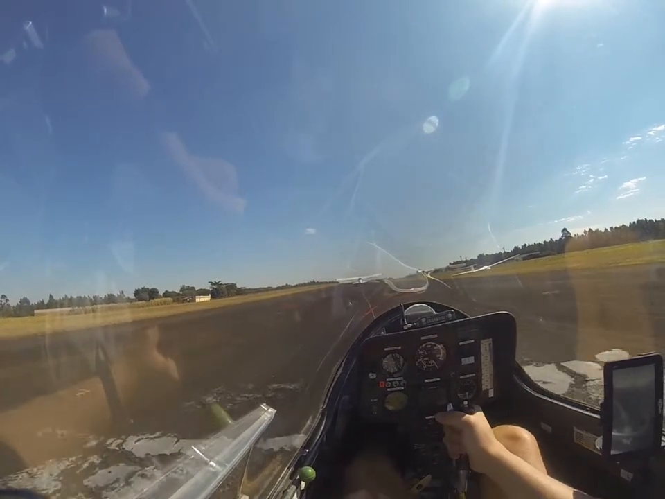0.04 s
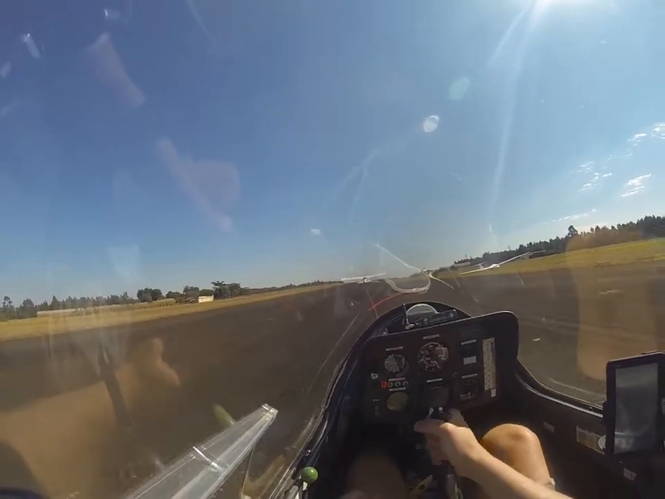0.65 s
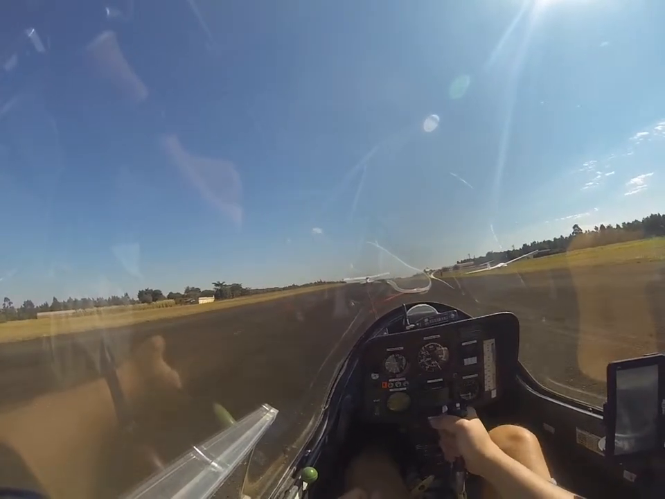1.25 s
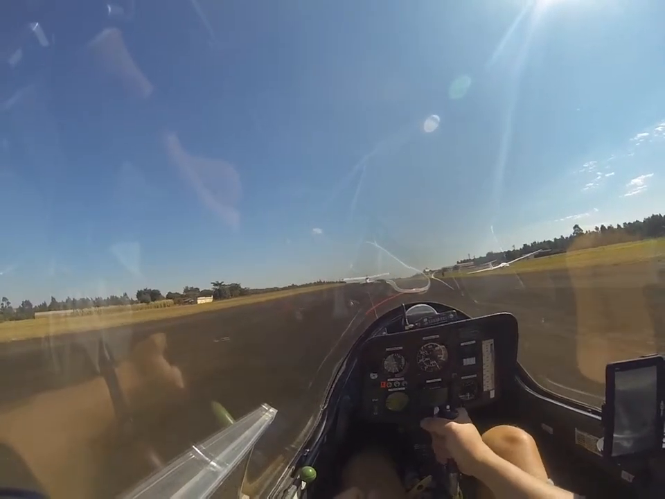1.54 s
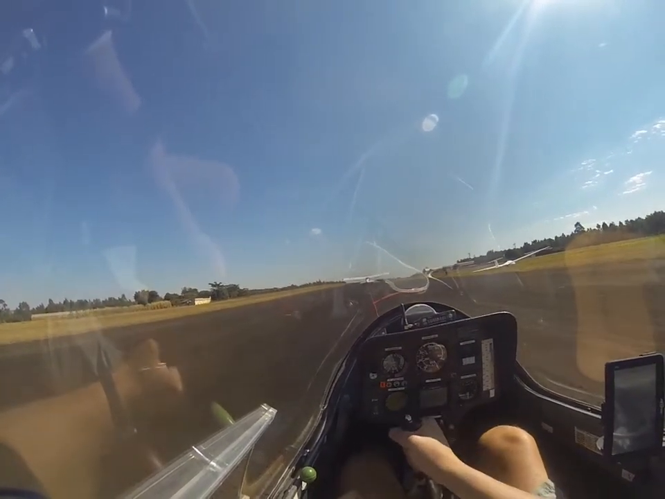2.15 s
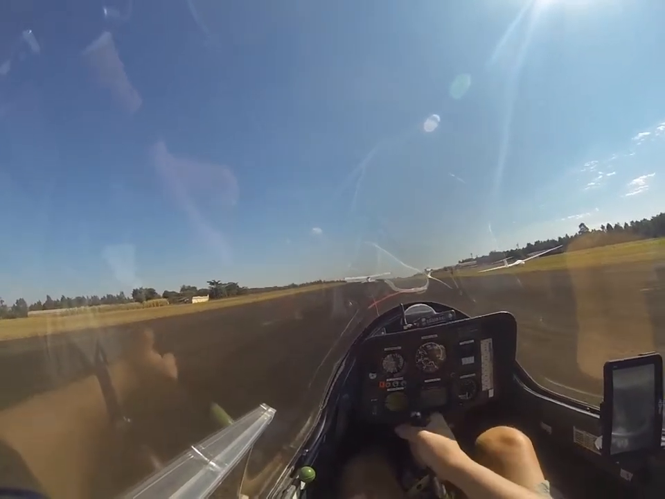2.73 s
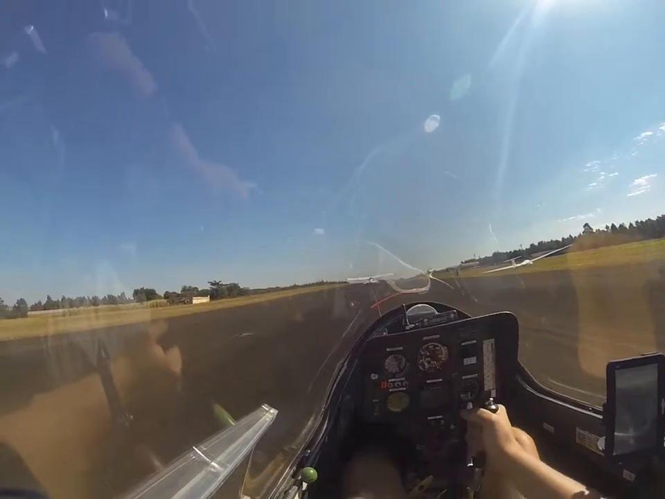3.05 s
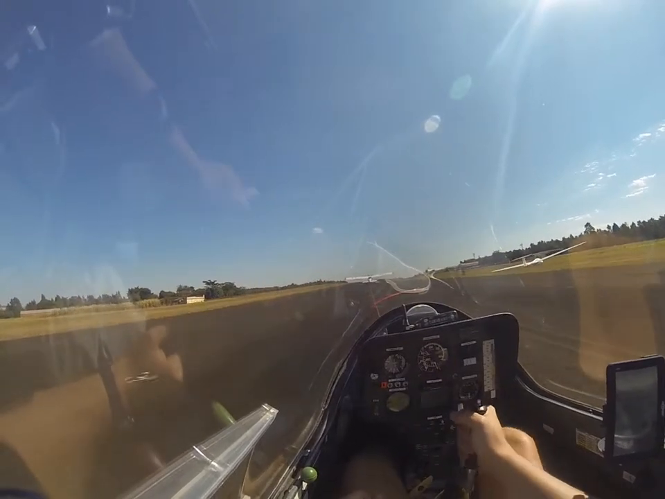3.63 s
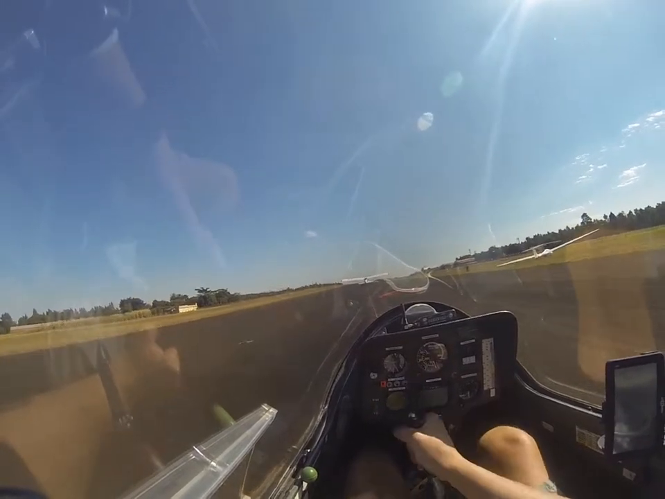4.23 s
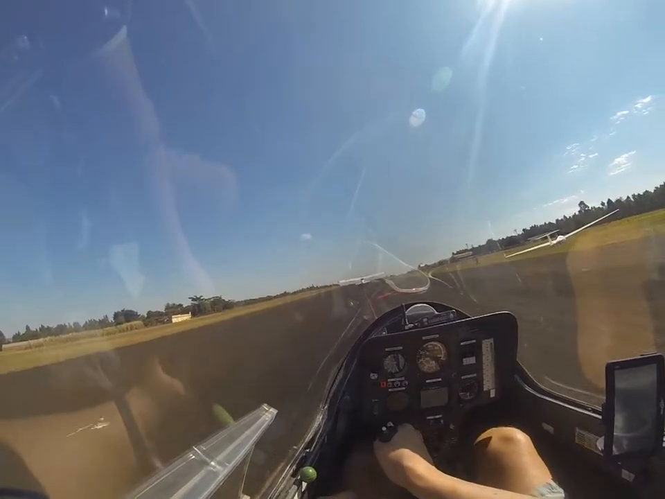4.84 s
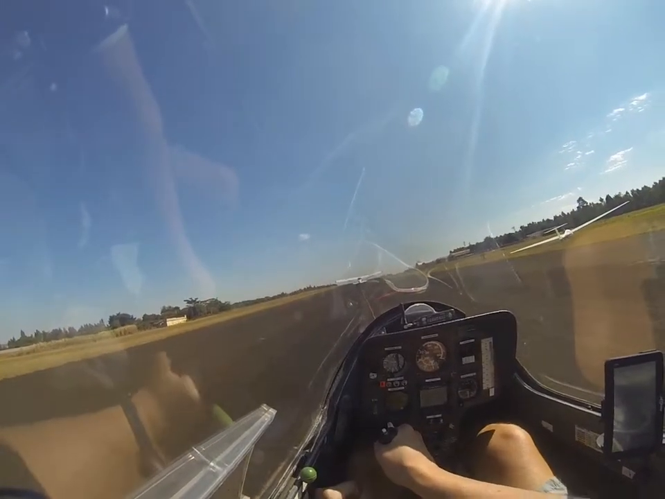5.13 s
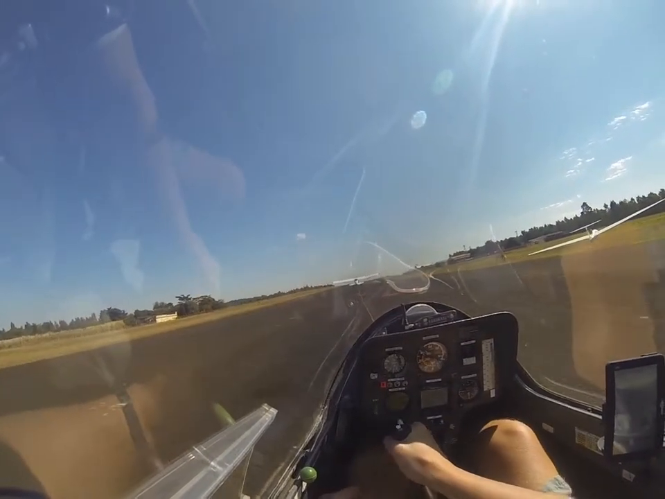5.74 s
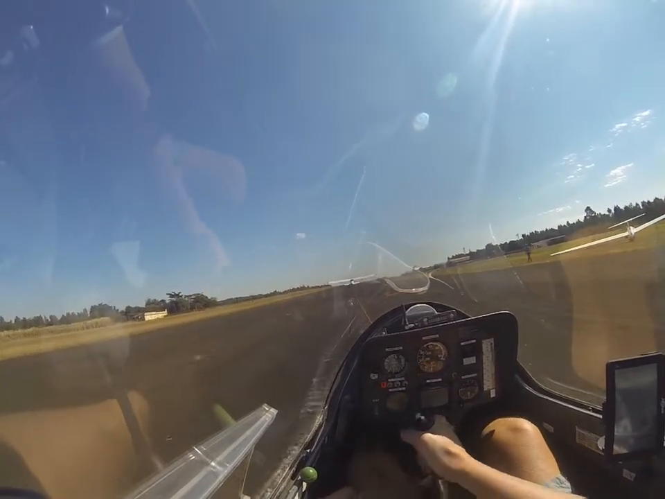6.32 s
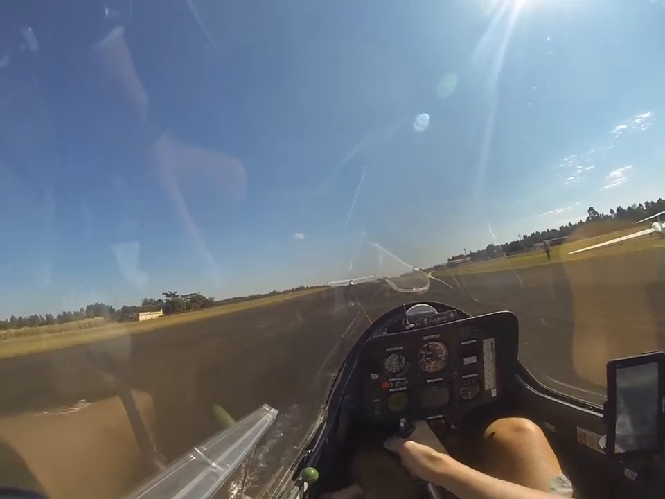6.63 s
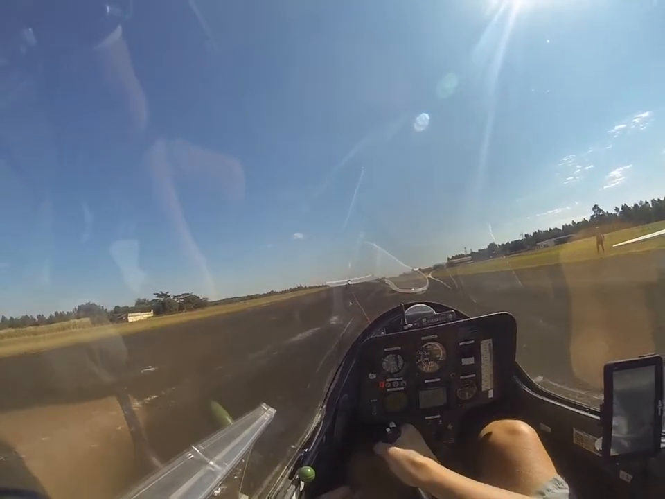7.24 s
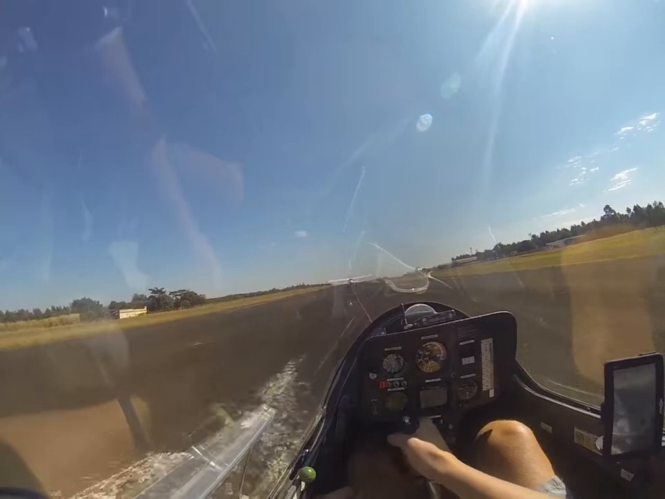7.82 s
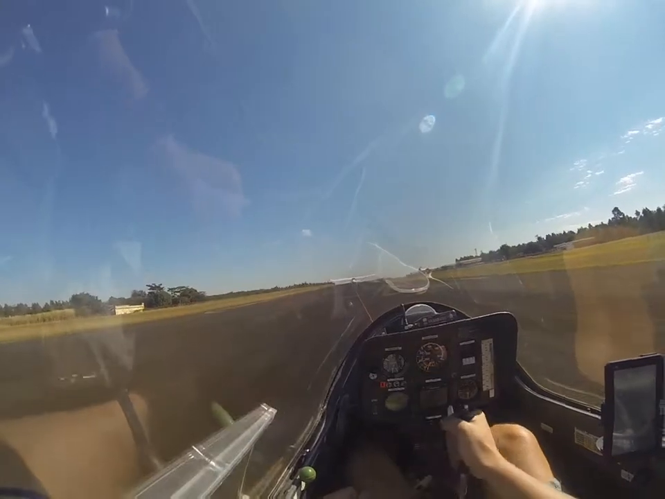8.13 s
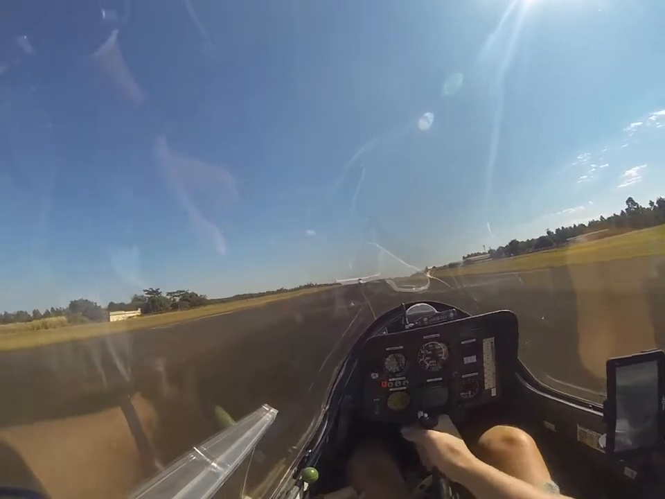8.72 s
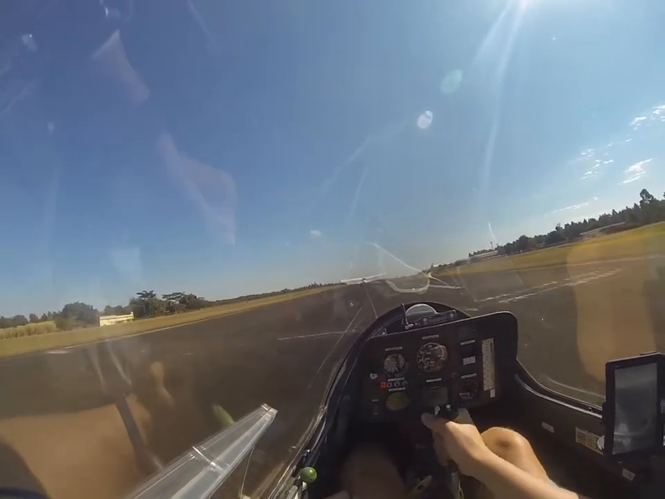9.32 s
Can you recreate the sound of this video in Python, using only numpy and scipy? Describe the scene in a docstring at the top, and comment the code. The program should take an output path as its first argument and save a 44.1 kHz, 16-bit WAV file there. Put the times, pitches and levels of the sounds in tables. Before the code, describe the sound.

A deep wheel rumble and hollow booming fill a glider's cockpit, heard from behind the pilot and building with speed. Runway seams knock the hull, with one heavy thump at 0.6 seconds and lighter ones around 1.5. Rough patches make the rumble surge between 1.5 and 4.5 seconds, then again at 7.5 and 9. From 1.7 seconds a loose fitting ticks in dry, irregular runs. Plastic rubs and snags in short scratchy strokes as the stick moves, busiest from 0.5 to 1.6, from 2.8 to 4.7 and after 8 seconds. A dry joint gives a few faint, high squeaks around 3 seconds. A low wavering drone sits underneath, strongest near 3 seconds, and the tail wheel's deep throb swells around 7 to 8.5. Soft air hiss grows over the canopy, with a barely audible high electronic whine, until the end just past 9 seconds.

```python
"""Inside a glider's cockpit, on the ground run of a tow. The wheel rumbles and the shell booms, louder
with speed and on rough patches. Runway seams thump the hull, the tail wheel throbs as it spins up
and a loose fitting ticks. Plastic rubs and snags in strokes as the stick is worked; a dry joint
squeaks. Air hisses over the canopy above a low drone, and a camera's electronics whine faintly."""
import sys
import numpy as np
from scipy import signal
from scipy.fft import rfft, irfft, next_fast_len
from scipy.io import wavfile
from scipy.ndimage import uniform_filter1d, minimum_filter1d, map_coordinates

SR = 44100
rng = np.random.default_rng(int(sys.argv[2]) if len(sys.argv) > 2 else 0)


def log_audio(samples):
    """Write samples as a 16-bit WAV file to the path given in sys.argv[1]."""
    # one column per channel
    frames = np.atleast_2d(samples).T
    # limit to full scale, then quantise
    limited = np.clip(frames, -1, 1)
    pcm = np.round(limited * 32767).astype(np.int16)
    wavfile.write(sys.argv[1], SR, pcm)


N = 413216
CONTACT_RISE_S = .001


def amp(db):
    """Decibels to gain."""
    return 10 ** (np.asarray(db) / 20)


def unit(x):
    """Scale to rms 1."""
    return x / np.sqrt(np.mean(x ** 2) + 1e-20)


def curve(rows):
    """(t/s, value) rows interpolated per sample."""
    return np.interp(np.arange(N) / SR, *np.transpose(rows))


def wobble(rate_hz):
    """Smooth random curve, rms near 1, through rate_hz knots a second."""
    knots = rng.standard_normal(int(N * rate_hz / SR) + 4)
    return map_coordinates(knots, [np.arange(N) * rate_hz / SR])


def sine(hz):
    """Sine of peak 1 following a per-sample frequency."""
    return np.sin(2 * np.pi * np.cumsum(hz) / SR)


def filtered(x, response):
    """Apply response(f/Hz) to the spectrum of x."""
    size = next_fast_len(N + SR // 2)
    return irfft(rfft(x, size) * response(np.fft.rfftfreq(size, 1 / SR)), size)[:N]


def coloured(x, spectrum):
    """Shape x by (f/Hz, level/dB) rows; rms 1."""
    f, db = np.transpose(spectrum)
    response = lambda hz: amp(np.interp(np.log(hz + 1), np.log(f), db, left=-120, right=-120))
    return unit(filtered(x, response))


def noise(spectrum):
    """Shaped Gaussian noise, rms 1."""
    return coloured(rng.standard_normal(N), spectrum)


def grains(rate_hz, spread_db):
    """Random impulses of uneven size, rms 1."""
    impulses = (rng.random(N) < rate_hz / SR) * rng.choice([-1, 1], N)
    return unit(impulses * amp(spread_db * rng.standard_normal(N)))


def patchy(x, depth_db):
    """Bands swell and fade separately, as when a rubbing contact shifts; rms 1."""
    bands = signal.stft(x, nperseg=512)[2]
    swell = uniform_filter1d(rng.standard_normal(bands.shape), size=7, axis=0)
    swell = unit(uniform_filter1d(swell, size=9, axis=1))
    return unit(signal.istft(bands * amp(depth_db * swell), nperseg=512)[1][:N])


def ring(modes, attack_s, vary_db, length_s):
    """One blow: damped modes of alternating sign, scattered in level and phase."""
    t = np.arange(int(length_s * SR)) / SR
    tones = np.zeros(len(t))
    for k, (hz, db, t60_s) in enumerate(modes):
        decay = amp(db + vary_db * rng.standard_normal() - 60 * t / t60_s)
        phase_rad = k * np.pi - np.pi / 8 + .7 * rng.uniform(-1, 1)
        tones += decay * np.sin(2 * np.pi * hz * t + phase_rad)
    return tones * (1 - np.exp(-t / attack_s))


def burst(t60_s, length_s):
    """Envelope of a hard contact: fast rise, exponential decay."""
    t = np.arange(int(length_s * SR)) / SR
    return amp(-60 * t / t60_s) * (1 - np.exp(-t / CONTACT_RISE_S))


def add(track, start_s, sound):
    """Mix sound into track in place."""
    part = track[int(start_s * SR):][:len(sound)]
    part += sound[:len(part)]


def speed_db(full_db, db_per_doubling):
    """Level that follows ground speed, which levels off towards full speed."""
    start_share, time_constant_s = .29, 4.4
    speed = 1 - (1 - start_share) * np.exp(-np.arange(N) / SR / time_constant_s)
    return full_db + db_per_doubling * np.log2(speed)


def rumble():
    """Runway grain hammers the wheel; the hull shudders, the floor drums, the shell booms."""
    # spectra: f/Hz, level/dB
    shudder_spectrum = [(10, 2), (32, -3), (43, 5.5), (60, -6.5), (90, -31.5)]
    drum_spectrum = [(48, -16), (66, -1), (91, 2.5), (120, -11), (138, -3), (175, -35.5)]
    shell_spectrum = [(105, -16.5), (138, 2), (195, -4.5), (243, 2.5), (275, -2), (325, -0.5), (350, -4.5),
                      (385, -16.5), (590, -29), (1100, -49.5)]
    # floor drumming, strongest at middling speed: t/s, level/dB
    drum_level = [(0, -20.5), (1.3, -22.5), (2.3, -16.5), (5.7, -17), (6.8, -22.5)]
    # shell's low band against the rest: t/s, gain/dB
    low_gain = [(0, -6), (4.2, 1.5), (6.3, 3), (6.9, 1), (9.37, -2)]
    # rough runway patches: t/s, length/s, shell gain/dB, shudder gain/dB
    patches = [(1.467, 0.18, 8.5, 4), (1.762, 0.64, 4, 9), (2.203, 0.31, 4.5, 1), (2.769, 0.77, 5.5, 2),
               (3.85, 0.79, 4, 1), (4.87, 0.93, -2.5, 4), (7.49, 0.34, 4.5, 7.5), (9.075, 0.24, 6, 9.5)]
    t = np.arange(N) / SR
    rise_s = .021
    shell_db, shudder_db = sum(np.outer(gains_db, np.interp(t - s, [0, rise_s, length_s], [0, 1, 0]))
                               for s, length_s, *gains_db in patches)
    shudder_db += speed_db(-18.5, db_per_doubling=1.6)
    shudder = amp(shudder_db) * noise(shudder_spectrum)
    drum = amp(curve(drum_level)) * noise(drum_spectrum)
    boom = coloured(grains(rate_hz=900, spread_db=3), shell_spectrum)
    low = filtered(boom, lambda hz: hz < 167)
    shell_db += speed_db(-16, db_per_doubling=7.4)
    shell_db += .98 * wobble(14)  # smaller changes in the surface
    shell = amp(shell_db) * (boom - low + amp(curve(low_gain)) * low)
    return shudder + drum + shell


def cabin():
    """Tyre roar excites a hollow cabin resonance, louder with speed."""
    centre_hz, half_width_hz = 491, 49.3
    resonance = lambda hz: 1 / (1 + ((hz - centre_hz) / half_width_hz) ** 4)
    roar = unit(filtered(rng.standard_normal(N), resonance))
    return amp(speed_db(-37, db_per_doubling=8.1)) * roar


def tail_wheel():
    """The unbalanced tail wheel throbs once a turn as it spins up."""
    # throb: t/s, level/dB
    throb_level = [(0, -39), (6.5, -24.5), (7.3, -16), (8.4, -17), (9.37, -22.5)]
    start_hz, rise_hz_per_s = 23.5, 1
    spin_hz = start_hz + rise_hz_per_s * np.arange(N) / SR + .36 * wobble(1.8)
    rms_db = curve(throb_level) + .92 * wobble(2.2)
    return amp(rms_db) * np.sqrt(2) * sine(spin_hz)


def drone():
    """A low wavering tone through the hull, probably the tow plane's propeller."""
    # drone: t/s, level/dB
    drone_level = [(0, -27), (3.3, -20.5), (4.8, -25), (7, -29.5)]
    pitch_hz = 92.75 + 1.504 * wobble(6)
    rms_db = curve(drone_level) + 2.4 * wobble(5.6)
    return amp(rms_db) * np.sqrt(2) * sine(pitch_hz)


def airflow():
    """Air over the canopy hisses, louder with speed."""
    # air noise: f/Hz, level/dB
    air_spectrum = [(300, 0.5), (1050, 2.5), (1280, 7.5), (1700, -13), (2100, -11.5), (4200, -33),
                    (14000, -50.5)]
    gusts_db = 1.2 * wobble(12)
    return amp(speed_db(-43.5, db_per_doubling=4.7) + gusts_db) * noise(air_spectrum)


def whine():
    """Camera electronics sing faintly, pulsing on and off."""
    # whine partials: f/Hz, level/dB
    partials = [(6450, -66.5), (12890, -70.5)]
    pulse_hz = 47.95
    gate = (1 + np.sin(2 * np.pi * pulse_hz * np.arange(N) / SR)) / 2
    drift = 1 + .003 * wobble(150)
    return gate * sum(amp(db) * sine(hz * drift) for hz, db in partials)


def seams():
    """Each runway seam thumps the hull and makes the cockpit clatter."""
    # seams: t/s, thump/dB, clatter/dB
    hits = [(.071, -18, -28), (.3435, -22, -20), (.577, -1.5, -18), (1.484, -16, -21), (1.585, -21, -24)]
    # hull modes: f/Hz, level/dB, t60/s
    hull_modes = [(43, -3.5, 0.34), (81.4, 0.5, 0.29), (202, -11, 0.029)]
    # cockpit clatter: f/Hz, level/dB
    clatter_spectrum = [(300, -3), (850, -15), (1300, -2), (1750, -5), (4500, -36)]
    thumps, jolts = np.zeros(N), np.zeros(N)
    for s, thump_db, clatter_db in hits:
        add(thumps, s, amp(thump_db) * ring(hull_modes, attack_s=.001, vary_db=.5, length_s=.5))
        add(jolts, s, amp(clatter_db) * burst(t60_s=.06, length_s=.5))
    return thumps + jolts * noise(clatter_spectrum)


def rubbing_force():
    """Strokes over light chafing; returns force (1 = firm stroke) and extra hiss gain."""
    # chafing force: t/s, level/dB
    chafe = [(0, -75), (1.385, -57.5), (1.41, -44), (1.65, -44), (2.1, -56.5), (2.6, -61.5), (3.3, -47),
             (4.1, -43), (5.2, -75), (7.9, -70), (8.85, -47.5), (9.37, -52)]
    # strokes: t/s, length/s, force/dB, extra hiss/dB
    strokes = [(0.228, 0.26, -52, -1.5), (0.536, 0.21, -44.5, 1.5), (0.61, 0.062, -52, 6.5),
               (0.689, 0.078, -43.5, 6), (0.785, 0.12, -56, 12), (0.942, 0.24, -61, 10.5),
               (1.16, 0.06, -40.5, 8), (1.214, 0.15, -41.5, 8.5), (1.504, 0.12, -40, 4.5),
               (2.789, 0.2, -37.5, -6), (3.208, 0.038, -45.5, 9), (3.37, 0.057, -42, -4),
               (3.435, 0.12, -70, 2.5), (3.755, 0.053, -45, 3.5), (3.806, 0.092, -35.5, 7.5),
               (3.948, 0.044, -40, 8.5), (4.043, 0.15, -44, -2), (4.153, 0.1, -39.5, 6.5),
               (4.276, 0.078, -31, 4.5), (4.43, 0.054, -47, 5.5), (4.644, 0.077, -42, 0),
               (4.829, 0.085, -54, 4), (4.928, 0.068, -48.5, -5), (5.597, 0.048, -44.5, -14),
               (5.66, 0.074, -47.5, -3), (5.97, 0.091, -59, -2), (6.151, 0.069, -52, -1),
               (6.814, 0.19, -55.5, -5), (7.095, 0.19, -58, 2), (8.096, 0.14, -56.5, 7),
               (8.26, 0.049, -45, 8.5), (8.32, 0.076, -50.5, 9.5), (8.418, 0.04, -49, 14.5),
               (8.553, 0.078, -46, 5.5), (8.656, 0.093, -45.5, 9), (8.749, 0.068, -40.5, 7),
               (8.96, 0.091, -39, 3)]
    attack_s, release_s, firm_db = .012, .016, -40
    scuffs_db = 2.5 * wobble(22)
    force, extra_hiss_db = amp(curve(chafe) + scuffs_db), np.zeros(N)
    for s, length_s, force_db, hiss_db in strokes:
        t = np.arange(int(length_s * SR)) / SR
        press = np.clip(np.minimum(t / attack_s, (length_s - t) / release_s), 0, 1)
        add(force, s, amp(force_db) * press)
        add(extra_hiss_db, s, hiss_db * press)
    return force / amp(firm_db), amp(extra_hiss_db)


def slips(spectrum):
    """Dense tiny slips ring the rubbed plastic; rms 1."""
    # plastic resonances: f/Hz, width/Hz, level/dB
    plastic_modes = [(914, 56, 8), (1161, 81, 7), (1375, 139, 8), (1716, 133, 8), (2300, 120, 2.5),
                     (2590, 210, -5.5), (3104, 210, -6), (3760, 110, -5.5), (4090, 260, -13),
                     (5510, 440, -20.5)]

    def body(f):
        return sum((-1) ** k * amp(db) * 1j * f * width / (hz * hz - f * f + 1j * f * width)
                   for k, (hz, width, db) in enumerate(plastic_modes))

    ringing = filtered(grains(rate_hz=1100, spread_db=1.2), body)
    return patchy(coloured(ringing, spectrum), depth_db=2)


def rubbing():
    """A fluttering force rubs plastic: dull scrape when light, hiss and fine spray when hard."""
    # coarse slips, fine slips, rustle and spray: f/Hz, level/dB
    grit_spectrum = [(400, -21.5), (1200, -1), (5000, -9), (9000, -20.5)]
    hiss_spectrum = [(1300, -15), (2700, -3), (5600, 0), (7500, -16.5), (11000, -14)]
    sheen_spectrum = [(3000, 7.5), (7000, 6), (8000, 1), (13000, -3), (14500, -11.5)]
    # large snags that break free with a gritty tick: t/s, level/dB
    catches = [(1.17, -33), (1.296, -28), (4.01, -25.5), (4.679, -30), (9.005, -25)]
    snag_rate_hz, snag_decay_s = 60, .007
    force, extra_hiss = rubbing_force()
    rustle = amp(-64 + wobble(7.1)) * force ** .25
    spray = amp(-68.5) * force ** .95 * extra_hiss
    sheen = (rustle + spray) * patchy(noise(sheen_spectrum), depth_db=2.5)
    t = np.arange(SR // 10) / SR
    release = np.exp(-t / snag_decay_s) * (1 - np.exp(-t / CONTACT_RISE_S))
    catch_gain = np.zeros(N)
    for s, db in catches:
        add(catch_gain, s, amp(db) * release)
    small_snags = signal.fftconvolve(1. * (rng.random(N) < snag_rate_hz / SR), release)[:N]
    flutter = amp(2 * wobble(34))  # uneven pressure
    scrape_gain = amp(-37) * force ** .5 * flutter * unit(1 + .9 * small_snags)
    scrape = (scrape_gain + catch_gain) * slips(grit_spectrum)
    hiss = amp(-46) * force ** .61 * extra_hiss * slips(hiss_spectrum)
    return scrape + flutter * (hiss + sheen)


def rattle():
    """A loose fitting lands with a dry snap and rebounds, seated a little differently each time."""
    # knocks, in runs of about ten a second: t/s, ring peak/dB
    knocks = [(1.682, -24.5), (1.7847, -21), (2.1, -28.5), (2.277, -29), (2.3971, -19.5), (2.491, -20),
              (2.7203, -24.5), (2.815, -19), (2.8906, -19.5), (2.923, -19.5), (2.9469, -16.5), (3.039, -23),
              (3.673, -24), (3.8655, -21.5), (4.372, -25.5), (4.489, -23), (4.831, -25.5), (5.16, -22.5),
              (5.1727, -14.5), (5.2565, -21.5), (5.371, -26.5), (5.7925, -27.5), (5.902, -25.5),
              (6.359, -30.5), (6.4552, -29.5), (6.552, -21.5), (6.6635, -23.5), (6.716, -29), (6.7655, -23),
              (7.1907, -20.5), (7.5034, -24), (7.6036, -25.5), (7.807, -26), (7.893, -26), (7.9936, -21.5),
              (8.191, -23.5), (8.2812, -24.5), (8.7262, -17), (8.829, -21), (8.9119, -17), (9.1128, -17.5)]
    # fitting modes: f/Hz, level/dB, t60/s
    fitting_modes = [(1214, -3, 0.03), (1320, 3.5, .018), (1650, -2.5, 0.0093), (2463, -6, 0.018),
                     (2950, -18.5, 0.022), (3570, -23, 0.0033), (3800, -25.5, 0.008)]
    # contact noise: f/Hz, level/dB
    snap_spectrum = [(700, -20), (1250, 0), (2700, -4.5), (4100, -12), (4500, -26), (6500, -32)]
    rebound_s, rebound_db, snap_db = .0018, -2, -2
    ticks, snaps = np.zeros(N), np.zeros(N)
    for s, db in knocks:
        seated = [(hz * (1 + .01 * rng.standard_normal()), mode_db, t60_s)
                  for hz, mode_db, t60_s in fitting_modes]
        tick, rebound = (ring(seated, attack_s=.0017, vary_db=2, length_s=.04) for _ in range(2))
        add(tick, rebound_s, amp(rebound_db) * rebound)
        add(ticks, s, amp(db) * tick / np.abs(tick).max())
        add(snaps, s, amp(db + snap_db) * burst(t60_s=.011, length_s=.04))
    return ticks + snaps * noise(snap_spectrum)


def squeaks():
    """A dry joint sticks and slips in a few wavering chirps."""
    # chirps: t/s, length/s, start f/Hz, end f/Hz, level/dB
    chirps = [(2.75, .135, 3780, 3830, -42), (2.81, .085, 3420, 3385, -41), (2.885, .075, 3640, 3730, -42),
              (3.31, .06, 3720, 3800, -46)]
    out, waver_hz = np.zeros(N), 75 * wobble(600)
    for s, length_s, start_hz, end_hz, db in chirps:
        progress = np.linspace(0, 1, int(length_s * SR))
        hz = start_hz + (end_hz - start_hz) * progress + waver_hz[int(s * SR):][:len(progress)]
        add(out, s, amp(db) * np.sin(np.pi * progress) * sine(hz))
    return out


def scene():
    """All sources, mono, heard from behind the pilot."""
    rolling = rumble() + cabin() + tail_wheel() + seams()
    return (rolling + drone() + rattle() + rubbing() + squeaks() + airflow() + whine())[None]


def record(dry):
    """Peak limiter, then brick-wall low-pass."""
    ceiling, window_samples, top_hz = .88, 900, 14800
    needed_gain = np.minimum(1, ceiling / (np.abs(dry[0]) + 1e-9))
    gain = uniform_filter1d(minimum_filter1d(needed_gain, window_samples), window_samples)
    return filtered(dry[0] * gain, lambda hz: hz < top_hz)[None]


dry = scene()
out = record(dry)
log_audio(out)
```